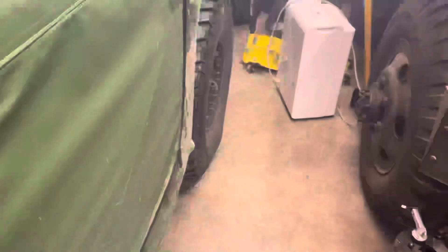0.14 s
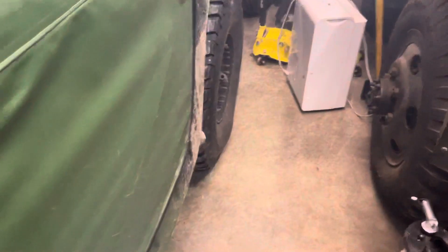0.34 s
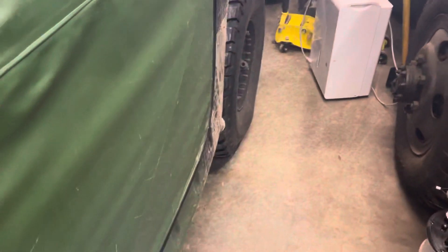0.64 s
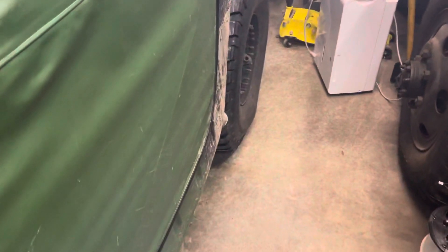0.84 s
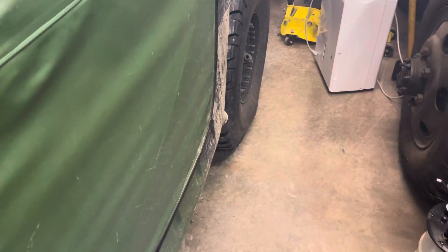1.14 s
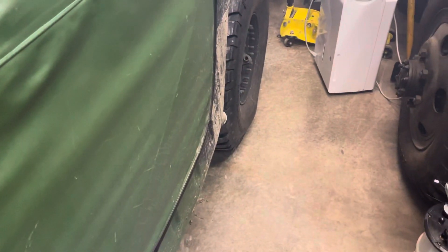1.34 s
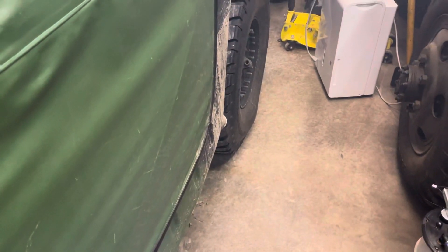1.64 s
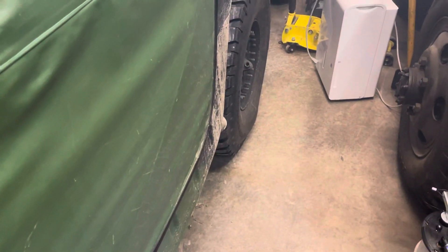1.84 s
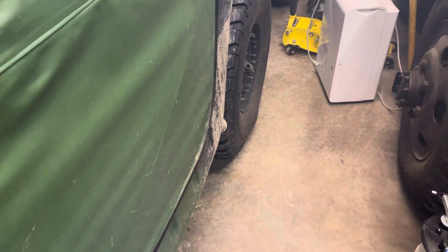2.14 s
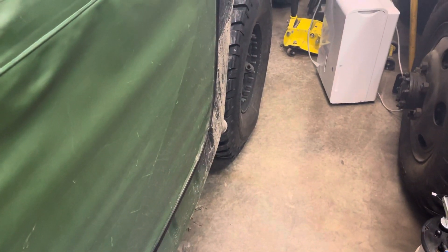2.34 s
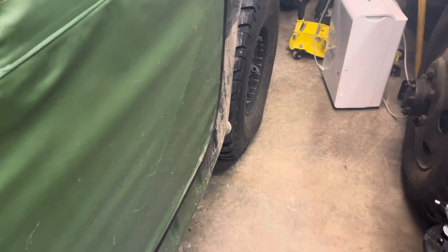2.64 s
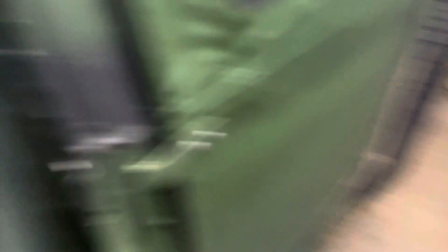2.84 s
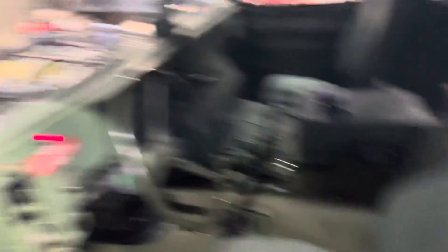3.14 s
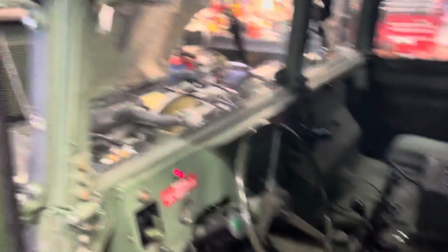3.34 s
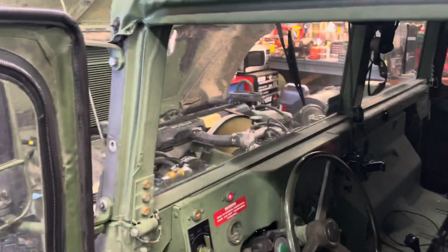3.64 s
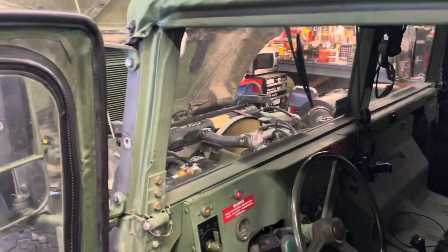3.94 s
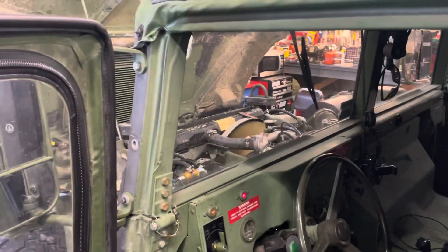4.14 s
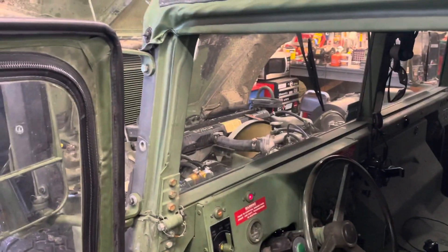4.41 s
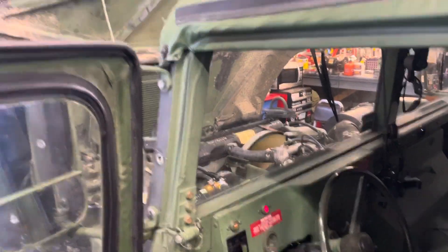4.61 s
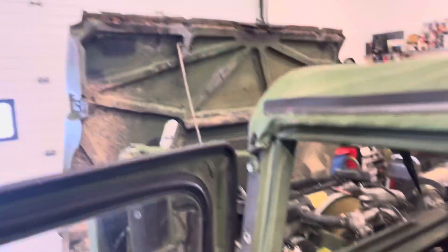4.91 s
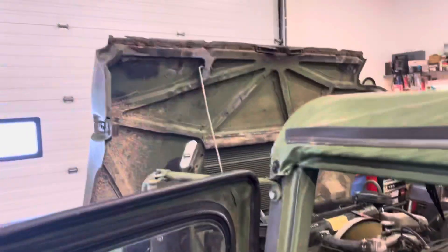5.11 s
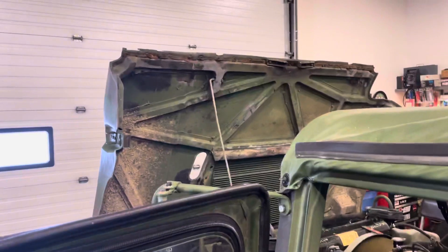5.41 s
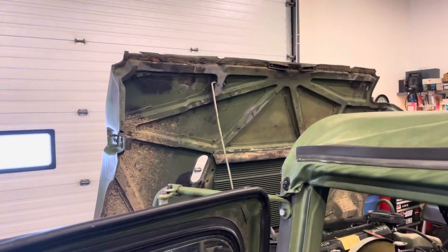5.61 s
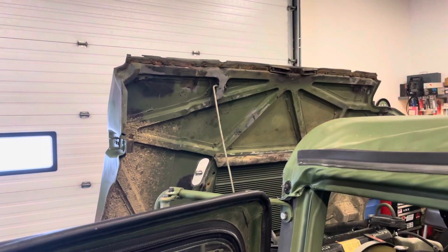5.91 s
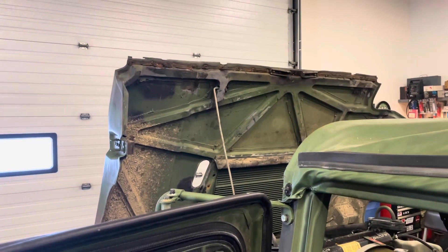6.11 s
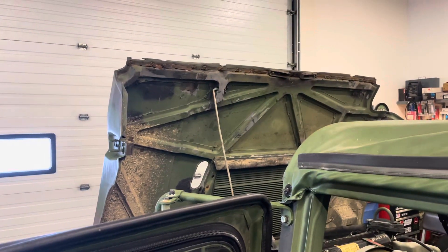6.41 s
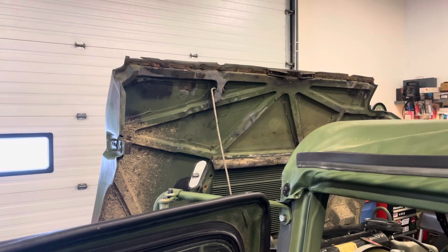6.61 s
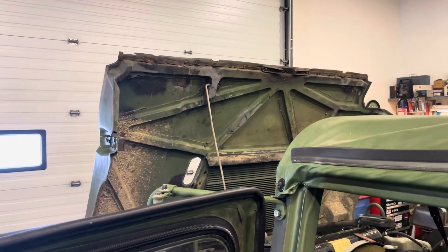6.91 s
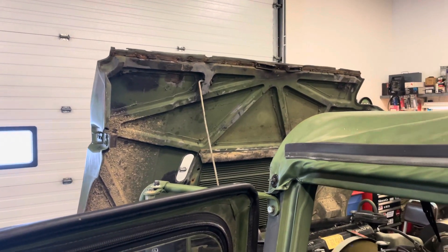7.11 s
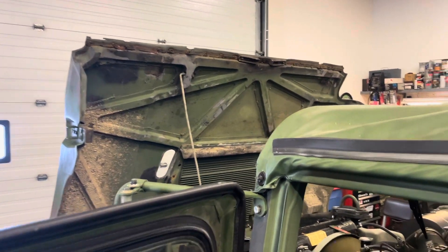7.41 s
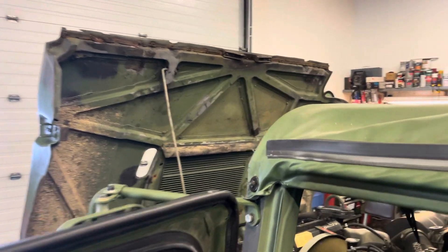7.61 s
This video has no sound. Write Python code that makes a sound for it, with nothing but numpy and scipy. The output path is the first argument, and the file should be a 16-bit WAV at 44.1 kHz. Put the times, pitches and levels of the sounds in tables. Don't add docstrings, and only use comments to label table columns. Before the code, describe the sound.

A starter's gear teeth grind for under half a second as a large eight-cylinder diesel catches, revs flaring with a rough exhaust roar. It drops straight into a steady, lumpy cold idle: low throb, hissing gas, hard uneven block knocks and light valve clatter. A handheld stereo phone stands close in a hard-walled garage, swinging from the exhaust side past the cab to the open bonnet while the level slowly sinks.

```python
import sys
import numpy as np
from scipy import signal
from scipy.fft import rfft, irfft
from scipy.io import wavfile
from scipy.ndimage import uniform_filter1d

SR = 44100
rng = np.random.default_rng(int(sys.argv[2]) if len(sys.argv) > 2 else 0)


def invert_db(x):
    u = np.asarray(x, float) / 20
    return 10 ** u


def wav_record(signal):
    frames = np.transpose(np.atleast_2d(signal))
    bounded = np.clip(frames, -1, 1)
    quanta = np.round(bounded * 32767).astype(np.int16)
    wavfile.write(sys.argv[1], SR, quanta)


N = 342216

# time_s, firing_rate_hz
SPEED = [(0, 36), (0.1, 42), (0.17, 54), (0.25, 59), (0.3, 44), (0.36, 37.5), (0.426, 36.301),
         (0.9, 36.999), (1.5, 37.236), (2.2, 37.322), (3.0, 37.696), (3.8, 37.867), (4.6, 37.969),
         (5.4, 38.356), (6.2, 38.568), (6.8, 38.751), (7.2, 38.784), (7.76, 37.149)]
FIRINGS_BEFORE = 19.246
# time_s, level_db
STARTER = [
    (0, -31.5),
    (.045, -33),
    (.26, -31.5),
    (.342, -30),
    (.452, -39.5),
]
# pitch_hz, level_db
GRIND = [(120, -45), (200, -6.5), (955, -5), (1190, -15), (1280, -4.5), (4730, -3), (8010, -13.5),
         (8620, -65), (9270, -16.5), (13300, -10), (15400, -38)]
# time_s, aim (0 exhaust side, 1 cab, 2 open bonnet)
PHONE = [
    (2.6, 0),
    (3.1, 1),
    (4.7, 1),
    (5.4, 2),
]
# panel_ring_db, upper_ring_db, left_minus_right_db
AIMS = [
    (0.5, -3, 0),
    (-11.5, -1.5, 0),
    (-7, 1.5, -.5),
]
# order (waves per eight-firing cycle, minus means inverted), level_db
ORDERS = [(8, 2.5), (9, -31), (11, -22), (12, -21), (13, -10), (14, -44), (15, -45), (-16, -16.5),
          (-17, -22.5), (18, -18.5), (19, -44), (22, -25), (23, -23), (24, -26.5)]
# time_s, weak_order_lift_db, firing_tone_db
LUMPS = [(0, -6, -3), (.12, 11.5, -2.5), (.26, -0.5, 0), (.3, 7.5, -15), (.36, 12.5, -5), (.45, 4, 3.5),
         (.7, 0, -1.5), (3.1, 2.5, -0.5), (3.6, -3, -1)]
# time_s, exhaust_pulse_db, combustion_db
CATCH = [(0, -17, -7), (.04, -15, -5.5), (.17, -0.5, -18.5), (.28, -0.5, -3.5), (.41, 0, -2.5),
         (.47, -0.5, -1.5), (.6, -0.5, -1), (.7, 4, -4), (.82, 0.5, -1.5)]
# time_s, lull_before_db, surge_after_db
HUNTS = [(1.36, -1, -1), (2.4, -2.5, 0), (3.03, -3, -1), (3.663, -2, 0), (5.14, -1.5, -1.5),
         (5.975, -0.5, 5), (7.425, -0.5, -1)]
# time_s, level_db
GAIN = [(.8, -0.5), (1.3, -1.5), (2.3, -2.5), (3, -3.5), (4.5, -4.5), (5.9, -6), (6.75, -5.5), (7.1, -7.5),
        (7.76, -5.5)]
HARD_PLACES = (1.27, 2.36)
# block_blow_db, tick_db
HARD = [
    [(2.8, -7), (7.6, 9), (5.7, 5)],
    [(3, 6.5), (3, 3.5), (4, 2)],
]
# time_s, block_blow_db, tick_db
UNEVEN = [(.263, 4.5, -10), (.284, -20, -21), (.461, -9, 7), (.491, -4, -1), (.68, 1.5, -5), (.71, 6, 6),
          (1.113, 2, 1), (1.543, -3.5, -5), (1.973, -0.5, 2), (2.187, -7, -9), (2.401, -1, 3),
          (2.644, 0, 1), (3.069, -3, -16), (3.281, 1, 1), (3.464, -2, -7), (3.493, -1, 3), (3.916, -5, -7),
          (4.098, -3, -0.5), (4.309, -2, -14), (4.759, -35, -4), (4.94, 2, 6.5), (5.983, -2.5, 4.5),
          (6.605, -2.5, -1), (6.84, 3, 7), (7.018, -1, -8), (7.225, -6.5, -3), (7.433, 0, 4.5),
          (7.674, -9, -14)]
# place_firings, block_blow_db, tick_db
CYLINDERS = [(3.45, 1, -7.5), (4.4, 0.5, -16), (5.4, 1, -8.5), (6.45, -0.5, -23), (7.4, -3.5, -26),
             (8.4, -2.5, -12)]
LOPE = [
    (-0.37, 1),
    (0.05, -0.6),
    (0.07, 1.2),
]
# start_s, block_blow_db, tick_db
EXTRA = [(.525, 5.5, 10), (.35, 6.5, -14), (0.61, 1, 9.5), (0.69, -4, 3), (2, -25, -1), (1.92, 0, 3),
         (2.11, -17, 3)]
# pitch_hz, width_hz, level_db
PANELS = [(921, 33, 0.5), (1155, 100, -3.5), (1248.6, 10.6, 4.5), (1664, 27, -10.5)]
# pitch_hz, width_hz, level_db
BLOCK = [(1174, 250, -7), (1550, 27, -1), (1709, 65, -13), (1888, 174, -11), (2857, 80, -10.5),
         (4090, 325, -9), (5310, 130, -16.5)]
# pitch_hz, level_db
MID = [(53, -21), (90, 1), (141, -5), (334, -8.5), (900, -5), (1220, -5.5), (2150, -2.5), (2500, -10),
       (4240, -20.5), (7260, -24), (8700, -37.5), (10000, -26), (13000, -21), (15400, -36.5)]
# pitch_hz, level_db
SIDES = [(53, -33), (90, -17), (151, -21), (365, -17.5), (549, -10.5), (1140, -12.5), (1450, -10),
         (1870, -3), (2480, -15), (2880, -18.5), (6520, -35.5), (7910, -19.5), (9810, -23.5),
         (11900, -28.5), (15400, -99)]
# pitch_hz, left_minus_right_db
LEAN = [(60, 0.84), (110, 1.3), (200, 0), (380, 1.5), (700, 0), (1290, -1.5), (2380, 1), (4390, 4),
        (8110, 1.5), (15000, -0.5)]
# place_firings, pitch_hz, ring_t60_s
PING = (6.55, 4320, 0.22)
# time_s, level_db
PING_AGAIN = [
    (.83, 1),
    (1.05, -2),
    (1.26, -13),
    (1.48, -5),
    (1.7, 9),
    (1.92, 4),
]

EXHAUST_DB, GAS_DB, BLOCK_DB, TICK_DB = -20.5, -33, -18.5, -33
GAS_SINK, TICK_SINK = 0.41, 1.3
GAS_FOLLOWS, TICK_FOLLOWS = 0.61, 0.37
FLARE_DB, FLARE_S = 8.5, 0.84
LULL_S, SURGE_S, TICK_HUNTS = 0.16, 0.043, 1.6
PING_FROM_S, PING_START_DB, PING_FADE_DB_PER_S = 0.36, -34.5, 12.5
SIDE_DB, LEAN_GAIN, PANEL_LOPE_DB = 3, 1.8, -10


def unit(x):
    return x / np.sqrt(np.mean(x ** 2))


def curves(table):
    time_s, *columns = np.transpose(table)
    return [np.interp(np.arange(N) / SR, time_s, column) for column in columns]


def aimed(time_s, table):
    aim = np.interp(time_s, *np.transpose(PHONE))
    return [np.interp(aim, np.arange(len(table)), column) for column in np.transpose(table)]


def colour(x, points, lo_hz=0., hi_hz=SR):
    f = np.arange(1, N // 2 + 2) * SR / N
    hz, db = np.transpose(points)
    edges = 1 / np.sqrt((1 + (lo_hz / f) ** 8) * (1 + (f / hi_hz) ** 8))
    level = invert_db(np.interp(np.log(f), np.log(hz), db))
    return irfft(rfft(x) * level * edges, N)


def rings(x, modes):
    out = 0
    for hz, width_hz, db in modes:
        b, a = signal.iirpeak(hz, hz / width_hz, fs=SR)
        out = out + invert_db(db) * signal.lfilter(b, a, x)
    return out


def walk(rate_hz):
    hold = int(SR / rate_hz)
    steps = np.repeat(rng.standard_normal(N // hold + 1), hold)
    return 1.3 * uniform_filter1d(uniform_filter1d(steps, hold), hold)[:N]


def clatter(per_s, spread_db, smear_s):
    clicks = (rng.random(N) < per_s / SR) * invert_db(spread_db * rng.exponential(size=N))
    tail = np.exp(-np.arange(SR // 10) / SR / smear_s)
    power = signal.fftconvolve(clicks, tail)[:N].clip(0) + 1e-6
    return unit(rng.standard_normal((2, N)) * np.sqrt(power))


def ports(x, lo_hz, hi_hz):
    mid = colour(x[0], MID, lo_hz, hi_hz)
    side = invert_db(SIDE_DB) * colour(x[1], SIDES, lo_hz, hi_hz)
    return np.array([mid, side]) / np.sqrt(np.mean(mid ** 2))


def levels():
    t, hunt = np.arange(N) / SR, 0
    (gain,), (pulse, burn) = curves(GAIN), curves(CATCH)
    for time_s, lull_db, surge_db in HUNTS:
        lull = lull_db * np.exp(-abs(t - time_s) / LULL_S)
        surge = surge_db * np.exp(-abs(t - time_s) / SURGE_S)
        hunt = hunt + np.where(t < time_s, lull, surge)
    flare = FLARE_DB * np.exp(-(t / FLARE_S) ** 2)
    throb = EXHAUST_DB + gain + pulse
    gas = GAS_DB + GAS_SINK * gain + GAS_FOLLOWS * burn + flare
    block = BLOCK_DB + gain + burn + hunt
    tick = TICK_DB + TICK_SINK * gain + TICK_FOLLOWS * burn + TICK_HUNTS * hunt
    return throb, gas, block, tick


def starter():
    teeth = clatter(per_s=1800.0, spread_db=-3.0, smear_s=0.0049)
    lifted = []
    for hz, db in GRIND:
        lift_db = np.interp(hz, [6000, 9900, 11600, 13500], [-3.5, 19, 1.5, -22])
        lifted.append((hz, db + lift_db))
    teeth = teeth + invert_db(1.5) * rings(teeth, [(953, 110, 8.0), (1153, 31, 14), (1610, 99, -1),
                                             (3510, 190, -3.0), (3780, 230, -19), (5030, 180, -10)])
    teeth = teeth - 0.6 * rings(teeth, [(2530, 290, 0)])
    teeth = teeth * invert_db(1.4 * walk(40))
    mid, side = colour(teeth[0], GRIND), colour(teeth[1], lifted)
    level_db = curves(STARTER + [(.54, -55)])[0] + 8.5
    return invert_db(level_db) / np.sqrt(np.mean(mid ** 2)) * np.array([mid, side])


def exhaust(firings):
    out, (lumps_db, line_db) = 0, curves(LUMPS)
    for order, db in ORDERS:
        loose = min(-db / 20, 1)
        rough = loose * (1 + lumps_db / 5) + 0.041
        turn = 2 * np.pi * abs(round(order)) * firings / 8 + 0.65 * rough * walk(2.8)
        level_db = db + loose * lumps_db + (order % 8 == 0) * line_db + 1.98 * rough * walk(8)
        out = out + np.sign(order) * invert_db(level_db) * np.cos(turn)
    return np.sqrt(2) * out


def exhaust_gas(firings):
    angle = (firings % 8 / 8 * 9000).astype(int)
    gas = rng.standard_normal((2, 9000))[:, angle] + .9 * rng.standard_normal((2, N))
    puffs = 1 + 0.073 * np.cos(2 * np.pi * firings)
    return ports(gas * puffs * invert_db(1.7 * walk(12)), 44., 697.0)


def firing_list(firings):
    t, hard = np.arange(N) / SR, []
    for cycle in range(-1, 35):
        for k, place in enumerate(HARD_PLACES):
            start_s = np.interp(8 * cycle + place, firings, t)
            strength = aimed(start_s, HARD[k]) + rng.standard_normal(2) * [1.0, 1.5]
            hard.append([start_s, *strength, k])
    hard = np.array(hard)
    for time_s, block_db, tick_db in UNEVEN:
        nearest = np.argmin(abs(hard[:, 0] - time_s))
        hard[nearest, 1:3] += [block_db, tick_db]
    rows = list(hard) + [(*row, 8) for row in EXTRA]
    for cycle in range(-3, 36):
        for k, (place, block_db, tick_db) in enumerate(CYLINDERS):
            scatter = rng.standard_normal(3) * [1.6, 2.2, .03]
            start_s = np.interp(8 * cycle + place + scatter[2], firings, t, -1, -1)
            if start_s >= 0:
                scatter[:2] += k * np.array(aimed(start_s, LOPE))
                rows.append((start_s, block_db + scatter[0], tick_db + scatter[1], 2 + k))
    return rows


def knocks(blows, column, sharp, lo_hz, hi_hz, mode_t60, mode_db, ring_t60, room_t60, room_db, count=36):
    t = np.arange(SR // 4) / SR
    rise = np.minimum(t / 0.0033, 1)
    room = invert_db(room_db) * 1000 ** (-t / room_t60)
    shape = rise * (0.38 * np.exp(-t / 0.0019) + 1000 ** (-t / ring_t60) + room)
    hz = lo_hz * (hi_hz / lo_hz) ** ((np.arange(count) + rng.random(count)) / count)
    modes = rise * np.exp(np.outer(2j * np.pi * hz, t)) * 1000 ** (-t / mode_t60)
    modes = np.vstack([modes.imag, modes.real])
    pool, out = rng.standard_normal((2, N + len(t))), np.zeros((2, N + len(t)))
    own = rng.standard_normal((9, count))
    own_noise, own_turn = rng.standard_normal((9, 2, len(t))), rng.random((9, 2, count))
    for row in blows:
        cylinder = int(row[3])
        i, j = max(int((row[0] - .003) * SR), 0), rng.integers(N)
        noise = .65 * own_noise[cylinder] + .75 * pool[:, j:j + len(t)]
        turn = own_turn[cylinder] + .15 * rng.standard_normal((2, count))
        vary_db = np.clip(3.5 * own[cylinder] + 4.5 * rng.standard_normal(count), -20, 9)
        struck = invert_db(mode_db + vary_db) * np.exp(2j * np.pi * turn) / np.sqrt(count)
        ringing = np.hstack([struck.real, struck.imag]) @ modes
        out[:, i:i + len(t)] += invert_db(sharp * row[column]) * (shape * noise + ringing)
    return unit(out[:, :N])


def block_knocks(blows, firings):
    panel_db, bright_db, _ = aimed(np.arange(N) / SR, AIMS)
    body = knocks(blows, column=1, sharp=0.86, lo_hz=647.3, hi_hz=2319.0, mode_t60=0.24, mode_db=-5.5,
                  ring_t60=0.71, room_t60=0.43, room_db=-11.5)
    body = body + invert_db(-7) * clatter(per_s=500., spread_db=4., smear_s=.008)
    shaken = body * invert_db(PANEL_LOPE_DB * ((firings - 1.2) % 8) / 8)
    body = body + invert_db(4.5) * rings(body, BLOCK) + invert_db(panel_db + 13.5) * rings(shaken, PANELS)
    body = body + (invert_db(bright_db) - 1) * rings(body, [(2100, 590, 0)])
    return ports(body, 470.0, 3360.0)


def valve_ticks(blows):
    tick = knocks(blows, column=2, sharp=0.9, lo_hz=2568.0, hi_hz=7140.0, mode_t60=0.29, mode_db=-7.5,
                  ring_t60=0.2, room_t60=0.48, room_db=-9.5)
    tick = tick + invert_db(2.5) * clatter(per_s=430.0, spread_db=-8.0, smear_s=0.016)
    tick = tick + invert_db(17) * rings(tick, BLOCK + [(4270, 95, -9)])
    return ports(tick, 2100.0, SR)


def patchy(x, low_db, high_db):
    hz, _, z = signal.stft(x, SR, nperseg=1024)
    field = rng.standard_normal(z.shape[1:])
    field = uniform_filter1d(field, size=7, axis=0)
    field = unit(uniform_filter1d(field, size=3, axis=1))
    depth_db = np.interp(hz, [0, 500, 3000, 7000], [0, low_db, low_db, high_db])[:, None]
    return signal.istft(z * invert_db(depth_db * field), SR, nperseg=1024)[1][:, :N]


def ping(firings):
    place, hz, t60 = PING
    cycle = ((firings - place) // 8).astype(int) + 8
    size_db = 1.5 * rng.standard_normal(50)
    for time_s, db in PING_AGAIN:
        size_db[cycle[int((time_s + .05) * SR)]] += db
    fade = np.exp(-((firings - place) % 8) / 0.78)
    rattle = rng.standard_normal((2, N)) * fade * invert_db(size_db)[cycle]
    width_hz = np.log(1000) / np.pi / t60
    tone = unit(rings(rattle, [(hz, width_hz, -3), (1.02 * hz, 2.6 * width_hz, -6)]))
    age = np.arange(N) / SR - PING_FROM_S
    return (age > 0) * invert_db(PING_START_DB - PING_FADE_DB_PER_S * age) * tone


def scene():
    firings = np.cumsum(curves(SPEED)[0]) / SR - FIRINGS_BEFORE
    throb_db, gas_db, block_db, tick_db = levels()
    blows = firing_list(firings)
    engine = invert_db(block_db) * block_knocks(blows, firings) + invert_db(tick_db + 5.5) * valve_ticks(blows)
    engine = patchy(engine, low_db=1.55, high_db=3.0)
    engine = engine + invert_db(gas_db + 1.5) * exhaust_gas(firings) + starter() + ping(firings)
    engine = engine + invert_db(throb_db) * exhaust(firings) * np.array([[1], [invert_db(-40)]])
    mid, side = engine
    hz, lean_db = np.transpose(LEAN)
    share = np.tanh(LEAN_GAIN * lean_db * np.log(10) / 40)
    leak = np.interp(np.arange(N // 2 + 1) * SR / N, hz, share)
    side = side + irfft(rfft(mid) * leak, N)
    pan_db = aimed(np.arange(N) / SR, AIMS)[2]
    return np.array([mid + side, mid - side]) * invert_db(np.array([pan_db, -pan_db]) / 2)


def low_pass(x):
    return signal.sosfilt(signal.butter(12, 15570, fs=SR, output="sos"), x)


def record(dry):
    mix = np.tanh(0.8 * dry) / 0.81
    return low_pass(mix)


dry = scene()
out = record(dry)
wav_record(out)
```